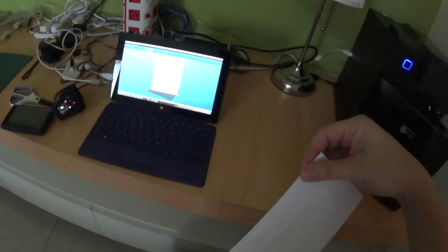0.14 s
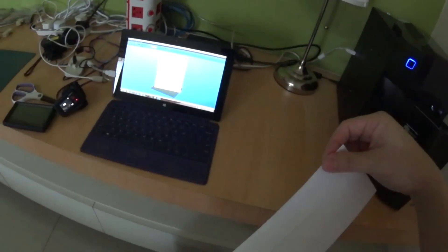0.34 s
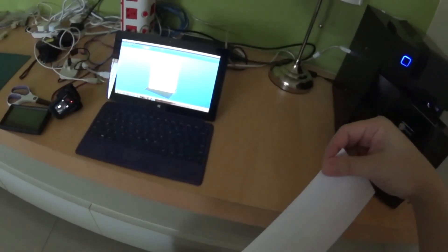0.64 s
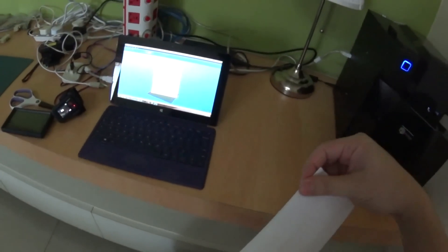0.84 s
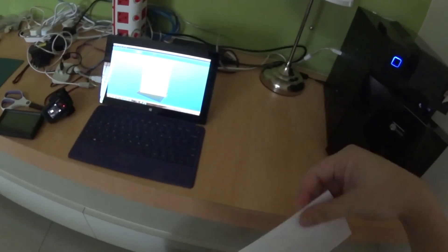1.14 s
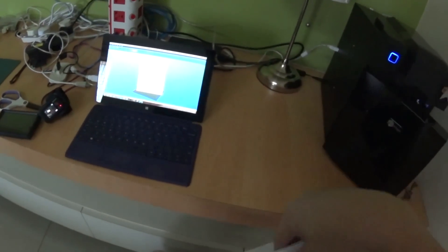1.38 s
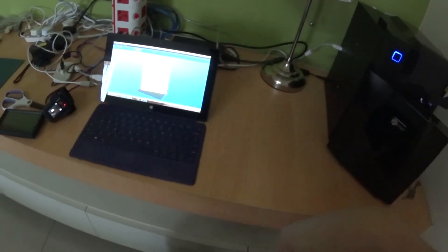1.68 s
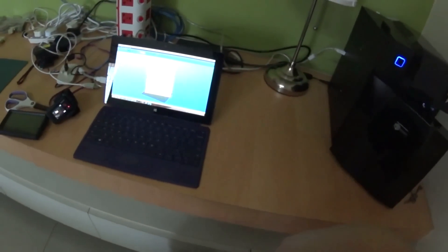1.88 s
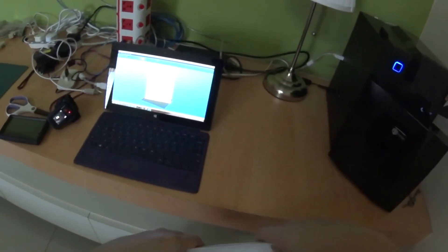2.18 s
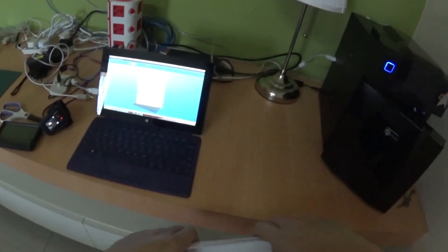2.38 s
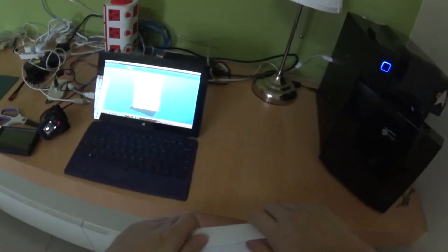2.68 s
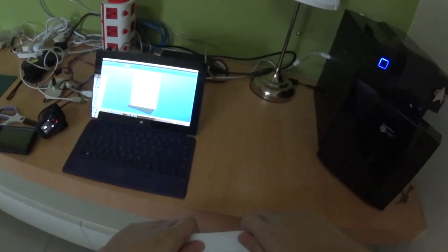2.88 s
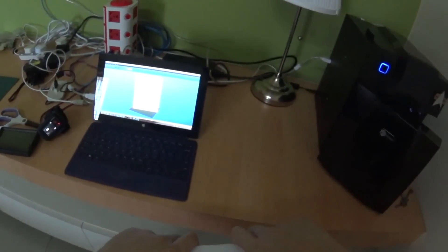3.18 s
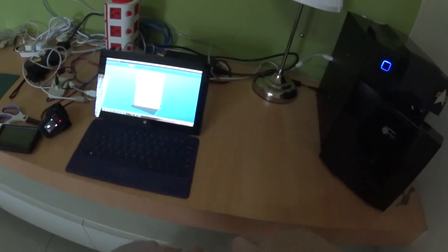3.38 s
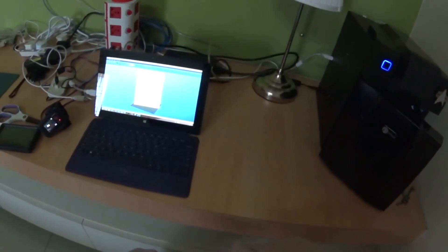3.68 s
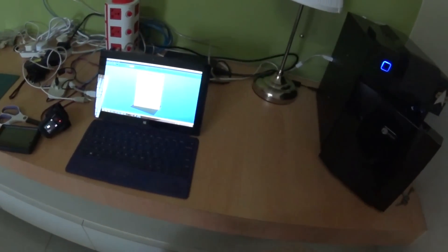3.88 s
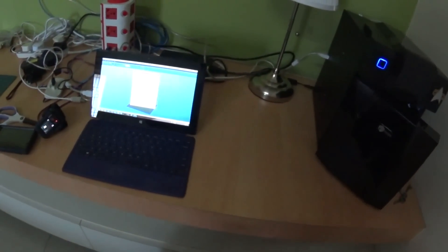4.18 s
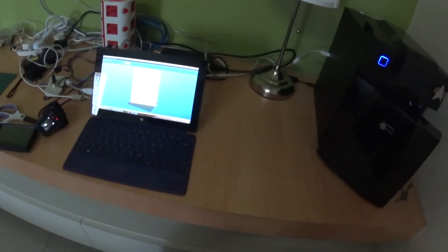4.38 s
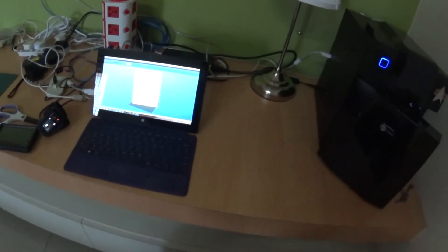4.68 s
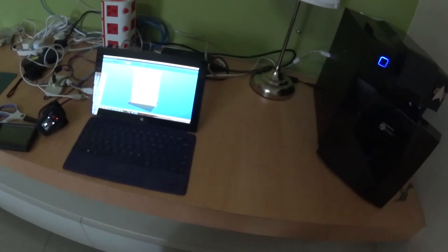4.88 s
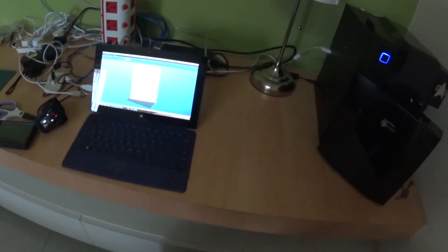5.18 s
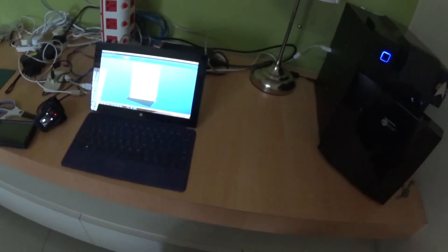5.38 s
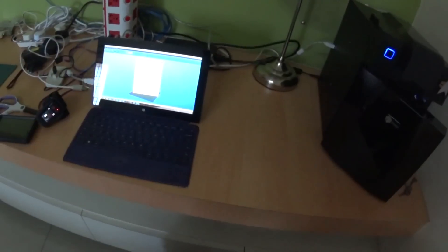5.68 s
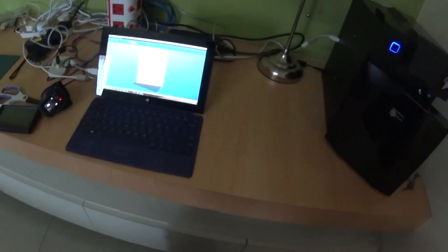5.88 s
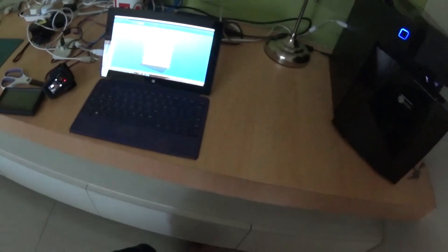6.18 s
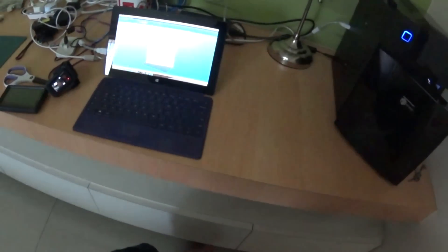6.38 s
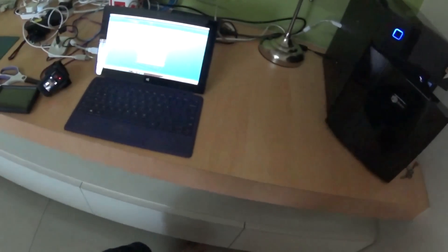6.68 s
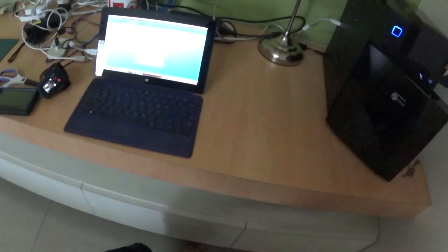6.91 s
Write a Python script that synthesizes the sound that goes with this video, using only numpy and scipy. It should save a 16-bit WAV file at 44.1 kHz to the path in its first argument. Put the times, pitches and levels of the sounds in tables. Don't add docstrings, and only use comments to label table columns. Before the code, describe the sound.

Close crisp paper folding: bright finger hisses along creases, sharp snaps and small soft flaps, over a steady computer fan hum in a small room.

```python
import sys
import numpy as np
from scipy import signal
from scipy.fft import rfft, irfft, next_fast_len
from scipy.io import wavfile
from scipy.ndimage import uniform_filter1d, map_coordinates

SR = 44100
rng = np.random.default_rng(int(sys.argv[2]) if len(sys.argv) > 2 else 0)


def unload_wav(signal):
    wavfile.write(
        sys.argv[1],
        SR,
        np.round(np.clip(np.atleast_2d(signal).T, -1, 1) * 32767).astype(np.int16),
    )


def attenuation_scalar(level_db):
    decades = np.asarray(level_db, float) / 20
    return 10 ** decades


N = 310905


def unit(x):
    return x / np.sqrt(np.mean(x ** 2) + 1e-20)


def along(points, hz):
    f, v = np.transpose(points)
    return np.interp(np.log(hz + 1), np.log(f + 1), v)


def wobble(rate):
    knots = rng.standard_normal(int(N * rate / SR) + 4)
    return map_coordinates(knots, [np.arange(N) * rate / SR])


def filtered(x, response):
    m = next_fast_len(x.shape[-1] + 8192)
    spectrum = rfft(x, m) * response(np.fft.rfftfreq(m, 1 / SR))
    return irfft(spectrum, m)[..., :x.shape[-1]]


def resonance(f, hz, width_hz):
    return 1j * f * width_hz / (hz * hz - f * f + 1j * f * width_hz)


def evened(x):
    z = rfft(x)
    power = uniform_filter1d(np.abs(z) ** 2, size=25, axis=-1)
    return irfft(z / np.sqrt(power), x.shape[-1])


def rush(gain, alike, patchy_db):
    z = signal.stft(rng.standard_normal((2, N)), nperseg=512)[2]
    field = uniform_filter1d(rng.standard_normal(z.shape[1:]), size=16, axis=0)
    field = uniform_filter1d(field, size=8, axis=1)
    pair = signal.istft(z * attenuation_scalar(patchy_db * unit(field)), nperseg=512)[1][:, :N]

    def mid_side_gain(hz):
        angle = np.arccos(np.clip(along(alike, hz), -1, 1)) / 2
        return gain(hz) * [np.cos(angle), np.sin(angle)]

    mid, side = filtered(pair, mid_side_gain)
    return unit(np.array([mid + side, mid - side]))


# frequency in Hz, level in dB per Hz.
FAN_AIR = [(15, -54), (25, -18.5), (143, -23), (216, -6), (271, -8.5), (326, -2.5), (592, -2.5), (728, 1),
           (1100, -2.5), (1910, -10.5), (2400, -11), (3160, -18.5), (6000, -24.5), (7800, -52),
           (13200, -120)]
# centre in Hz, width in Hz, height in dB.
FAN_HUMPS = [(118.8, 19, 11.5), (205.4, 30, 3), (314, 17, 3), (860, 90, 0.5), (3730, 61, -5.5),
             (6400, 40, -2)]
# frequency in Hz, left-right likeness from 0 to 1.
FAN_ALIKE = [(60, 0.81), (200, 0.95), (600, .93), (1200, 0.73), (2500, 0.42), (6000, 0.5)]


def fans():
    def gain(hz):
        humps_db = sum(db / (1 + (2 * (hz - c) / w) ** 2) for c, w, db in FAN_HUMPS)
        return attenuation_scalar(along(FAN_AIR, hz) + humps_db)

    air = rush(gain, FAN_ALIKE, patchy_db=0.85)
    return attenuation_scalar(-34.5 + 0.5 * wobble(2.964)) * air


# fastest moment in seconds, hiss in dB, seconds to gather 10 dB, seconds to lose 10 dB.
STROKES = [(.192, -38, .22, .36), (.515, -39, 1.2, .047), (.696, -34, .048, .19), (1.088, -39, .025, .3),
           (1.41, -35, .18, .07), (1.552, -35, .055, .4), (1.672, -35, .4, .076), (1.83, -47.5, .3, .9),
           (1.995, -37, .04, .4), (2.07, -37, .4, .068), (2.369, -42, .1, .09), (2.48, -37.5, .028, .088),
           (2.698, -38.5, .23, .022), (2.96, -45.6, .044, .4), (3.153, -40, .24, .045),
           (3.753, -40.5, .17, .075), (3.999, -41.5, .28, .05), (4.143, -43, .09, .25),
           (4.246, -42.5, .085, .25), (4.647, -43.9, .08, .26), (4.84, -40.5, .3, .15),
           (5.226, -43.8, .076, .9), (5.442, -40, .16, 1.5), (5.705, -37.5, .22, .375),
           (6.158, -41, .16, .036), (6.225, -39, .02, .22), (6.467, -34.5, .12, .055),
           (6.71, -32, .11, .14), (7.05, -38.5, .27, .1)]
# moment in seconds, hiss in dB, seconds to gather or lose 10 dB.
FLICKS = [
    (.996, -41, .03),
    (2.83, -49, .2),
    (3.293, -41.8, .085),
    (3.378, -43, .07),
    (3.434, -38, .02),
    (3.506, -40, .045),
    (4.536, -48.5, .1),
    (5.031, -44.5, .08),
    (5.11, -46, .065),
]
# time in seconds, added rustle in dB.
BEND = [(0, 0), (.7, -1.5), (1.07, -1), (1.24, 4.5), (1.62, -2), (2.3, 2), (2.8, 3), (3.0, -2), (4.15, -2),
        (4.32, 5.5), (4.58, -5), (4.76, 4), (4.9, 13), (5.1, -2), (5.48, 5.5), (6.1, -1), (6.35, 3),
        (6.75, -2.5)]


def slide():
    rest_db = -57.0
    rustle_under_db, rustle_grows = 6, 1.05
    settle_db, settle_db_per_s = -19, 110
    t = np.arange(N) / SR
    moves = sorted(STROKES + [(s, db, spread_s, spread_s) for s, db, spread_s in FLICKS])
    edges = [0] + [move[0] for move in moves] + [N / SR]
    hiss_db = np.full(N, rest_db)
    for (s, db, rise_s, fall_s), before, after in zip(moves, edges, edges[2:]):
        speed_db = db - 10 * np.maximum((s - t) / rise_s, (t - s) / fall_s)
        active = (t > before) & (t < after)
        hiss_db = np.maximum(hiss_db, np.where(active, speed_db, rest_db))
    bend_s, bend_db = np.transpose(BEND)
    drag_db = rustle_grows * (hiss_db + 42) - 42 - rustle_under_db + np.interp(t, bend_s, bend_db)
    settle = 0
    for s, _, panel_db, _, _ in SNAPS:
        settle = settle + (t > s) * attenuation_scalar(panel_db + settle_db - settle_db_per_s * np.abs(t - s)) ** 2
    return hiss_db, 10 * np.log10(attenuation_scalar(drag_db) ** 2 + settle)


# frequency in Hz, level in dB per Hz.
HISS = [(2500, -36), (4500, -7), (6500, 7.5), (8500, 11.5), (11000, 11.5), (13000, -19)]
# frequency in Hz, level in dB per Hz.
RUSTLE = [(600, -34), (1500, -5), (2800, -5.5), (4500, 0.5), (6000, 2), (9000, -5)]


def fingers():
    hiss_db, rustle_db = slide()
    grain_db = 0.44 * wobble(30) + 1.0 * wobble(400)
    hiss = rush(lambda hz: attenuation_scalar(along(HISS, hz)), [(5000, 0.91), (11000, 0.94)], patchy_db=0.6)
    rustle = rush(lambda hz: attenuation_scalar(along(RUSTLE, hz)), [(1500, 0.92), (5000, 0.93)], patchy_db=1.2)
    return attenuation_scalar(grain_db) * (attenuation_scalar(hiss_db + 0.14) * hiss + attenuation_scalar(rustle_db + 1.66) * rustle)


def crackle():
    rustle_db = slide()[1]
    chance, size = rng.random(N), rng.standard_normal(N)
    ticks = (chance < 260 / SR) * size * attenuation_scalar(1.5 * (rustle_db + 40.5) - 18)
    return filtered(ticks, lambda f: resonance(f, 3430, 4200) ** 2)


# start in seconds, panel in Hz, panel level in dB, crease in Hz, crease level in dB.
SNAPS = [(.3112, 1160, -25.5, 4180, -26), (.5222, 1520, -32.5, 3200, -39), (1.0154, 1120, -24, 3210, -45),
         (1.0222, 1940, -30, 3210, -49), (1.4362, 2540, -21.5, 5430, -22.5),
         (1.5783, 2350, -20.5, 5490, -26.5), (1.6974, 1090, -28, 4180, -31),
         (1.7406, 2450, -25.5, 5500, -23), (2.0713, 2300, -22.5, 3490, -32.5),
         (2.6539, 2130, -31, 7950, -24), (2.7426, 2050, -31.5, 5400, -22),
         (2.8277, 2300, -32.5, 10100, -22.5), (3.3733, 2000, -30, 5130, -29.5),
         (4.2388, 1420, -23, 8700, -19), (4.2688, 2670, -23, 4200, -25.5), (4.2996, 1280, -30, 3400, -26.5),
         (4.8191, 1080, -26.5, 6290, -18), (4.8501, 1140, -19, 6400, -20.5),
         (5.4074, 1590, -26.5, 3210, -34), (5.4333, 2020, -28, 8440, -19), (5.659, 1660, -32.5, 3210, -39),
         (6.279, 2260, -33, 7800, -31.5), (7.0019, 1140, -27, 4300, -31.5)]
# start in seconds, panel in Hz, panel level in dB, crease in Hz, crease level in dB.
CREAKS = [(.2951, 900, -36, 5300, -40), (.6807, 1140, -32.5, 4310, -39), (.991, 1550, -32, 4460, -36),
          (1.828, 1420, -35.5, 3470, -47), (1.8525, 1420, -36, 2800, -44), (2.949, 900, -40, 7280, -35.5),
          (3.127, 1420, -43, 8100, -35), (3.4071, 1180, -37, 3210, -44), (4.3584, 2710, -38, 3210, -45),
          (4.4524, 1750, -37, 3210, -55), (4.5387, 990, -37, 4160, -48), (4.64, 1100, -31, 4030, -42),
          (4.7554, 930, -38, 8660, -35), (5.0204, 1590, -40, 8140, -36), (5.7334, 1270, -36, 4330, -41),
          (6.094, 1000, -30.5, 3250, -41), (6.2212, 1400, -37, 8590, -40), (6.4633, 1460, -30.5, 3210, -42),
          (6.742, 1540, -32, 10490, -39)]


def snaps():
    lead = 64
    out, t = np.zeros(N + 2048), (np.arange(2048) - lead) / SR
    rows = [(*row, 14) for row in SNAPS] + [(*row, 27) for row in CREAKS]
    for s, panel_hz, panel_db, crease_hz, crease_db, cycles in rows:
        decay_s = max(1.53 * cycles / panel_hz, .002)
        shiver = rng.standard_normal((2, len(t))) * attenuation_scalar(-60 * t / decay_s) * (t >= 0)
        shiver[:, lead + 8] = -2.6
        low, high = evened(shiver)

        def panel_rings(f):
            return (resonance(f, panel_hz, 0.13 * panel_hz) + .35) * resonance(f, 1440, 2400) ** 2

        def crease_rings(f):
            body = resonance(f, 0.84 * crease_hz, 1.4 * crease_hz) ** 2
            return (resonance(f, crease_hz, .15 * crease_hz) + 0.66) * body

        panel = attenuation_scalar(panel_db - 8.5) * unit(filtered(low, panel_rings))
        crease = attenuation_scalar(crease_db - 9.5) * unit(filtered(high, crease_rings))
        out[round(s * SR) - lead:][:len(t)] += panel + crease
    return out[:N]


# start in seconds, peak in dB, frequency in Hz.
FLAPS = [(0.31, -22, 470), (0.519, -26, 435), (1.016, -18.5, 356), (1.434, -17.5, 604), (1.576, -21.5, 347),
         (2.07, -22.5, 493), (2.741, -28.5, 465), (4.262, -24, 403), (4.297, -19.5, 425),
         (4.849, -23.5, 440), (5.406, -19, 447), (5.66, -20, 424), (6.464, -29, 342)]


def flaps():
    out, t = np.zeros(N + 2048), np.arange(2048) / SR
    for s, db, hz in FLAPS:
        swell = attenuation_scalar(-60 * t / .03) * (1 - np.exp(-t / 0.0014))
        out[round(s * SR):][:len(t)] += attenuation_scalar(db + 1.5) * np.sin(2 * np.pi * hz * t) * swell
    return out[:N]


# nearer in Hz, farther in Hz.
FACETS = [(2690, 6980), (2610, 7670), (2560, 4100), (3700, 5380), (3430, 9000), (1130, 8740), (2400, 3100),
          (7300, 1210), (4300, 5600), (4410, 8600), (1650, 4200), (4600, 3200), (1600, 6780), (6220, 7100),
          (5600, 8800), (4330, 2500), (4440, 2900), (3750, 7000), (3200, 7000), (6460, 3140), (4740, 5620),
          (4000, 3100), (2410, 3660)]


def facets():
    out, t = np.zeros(N + 1024), np.arange(1024) / SR
    for (s, *_, crease_db), modes in zip(SNAPS, FACETS):
        shakes = evened(rng.standard_normal((2, len(t))) * attenuation_scalar(-60 * t / 0.0075))
        for shake, hz, db in zip(shakes, modes, (-9, -11)):
            ring = filtered(shake, lambda f: resonance(f, hz, 300 + .09 * hz) ** 2)
            out[round(s * SR):][:len(t)] += attenuation_scalar(crease_db + db - 4.5) * unit(ring)
    return out[:N]


# delay in seconds, left level in dB, right level in dB.
ECHOES = [
    (.0045, -11, -10),
    (.0071, -18, -16),
    (.011, -19, -21),
]


def nearby(x):
    paths = np.zeros((2, 1024))
    paths[:, 0] = 1
    for s, left_db, right_db in ECHOES:
        arrivals = round(s * SR) + np.array([0, 3])
        paths[[0, 1], arrivals] += attenuation_scalar([left_db, right_db])
    return signal.fftconvolve(x[None], paths, axes=1)[:, :N]


# frequency in Hz, time to fall 60 dB in seconds.
ROOM = [(300, 0.2), (1500, 0.99), (5000, 0.24), (11000, 0.23)]


def room(x):
    out, step = np.zeros((2, N + SR)), SR // 4
    for start in range(0, N, step):
        hz, t, z = signal.stft(rng.standard_normal((2, SR // 2)), SR, nperseg=256)
        decay = attenuation_scalar(-60 * t / along(ROOM, hz)[:, None])
        tail = signal.istft(z * decay, SR, nperseg=256)[1]
        tail = tail / np.linalg.norm(tail[0])
        wet = signal.fftconvolve(x[None, start:start + step], tail, axes=1)
        out[:, start + 200:start + 200 + wet.shape[1]] += wet
    return out[:, :N]


def scene():
    paper = crackle() + snaps() + flaps() + facets()
    return fans() + fingers() + nearby(paper) + attenuation_scalar(-11) * room(paper)


def roll_off(x):
    return signal.sosfilt(signal.butter(12, 12370, fs=SR, output="sos"), x)


def record(dry):
    top_hz = 11020
    limited = filtered(dry, lambda hz: attenuation_scalar(np.where(hz < top_hz, 0, -26 - (hz - top_hz) / 14)))
    squeezed = limited - 0.089 * limited ** 3
    return roll_off(squeezed)


dry = scene()
out = record(dry)
unload_wav(out)
```